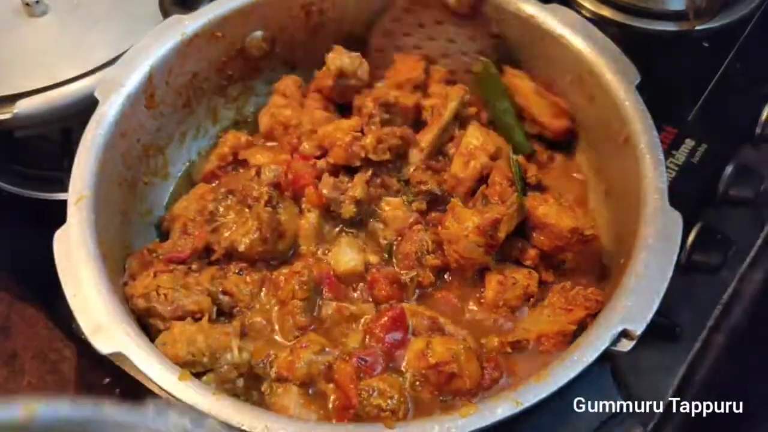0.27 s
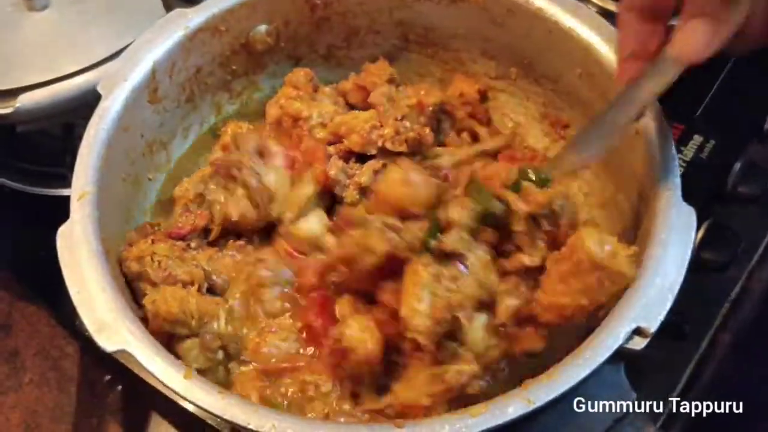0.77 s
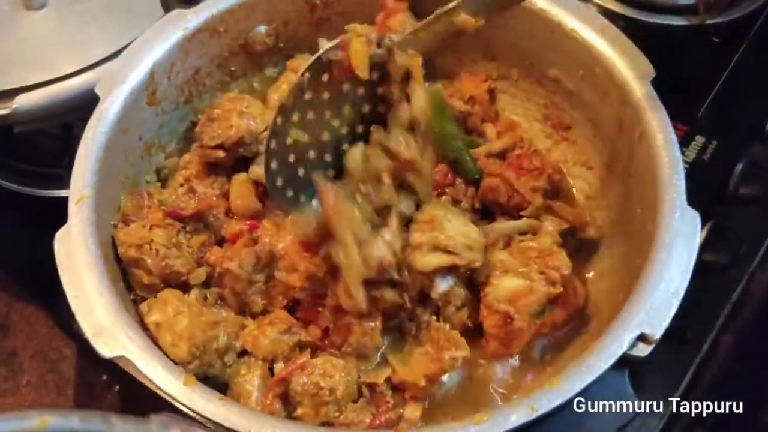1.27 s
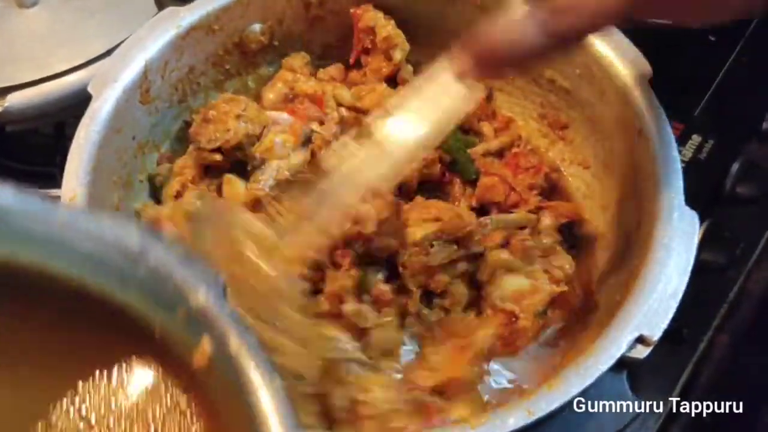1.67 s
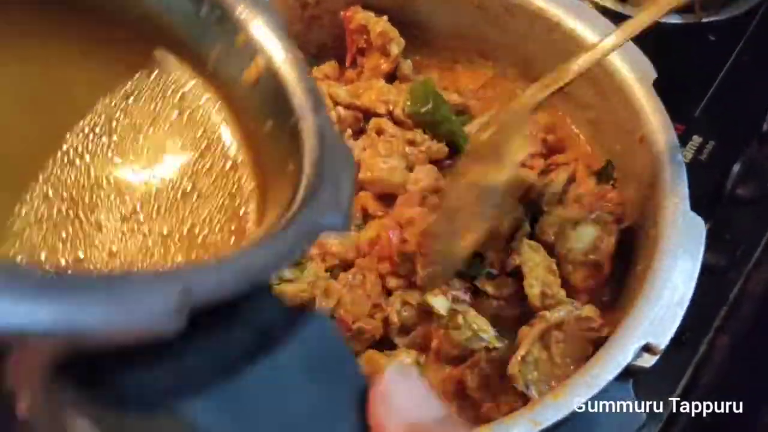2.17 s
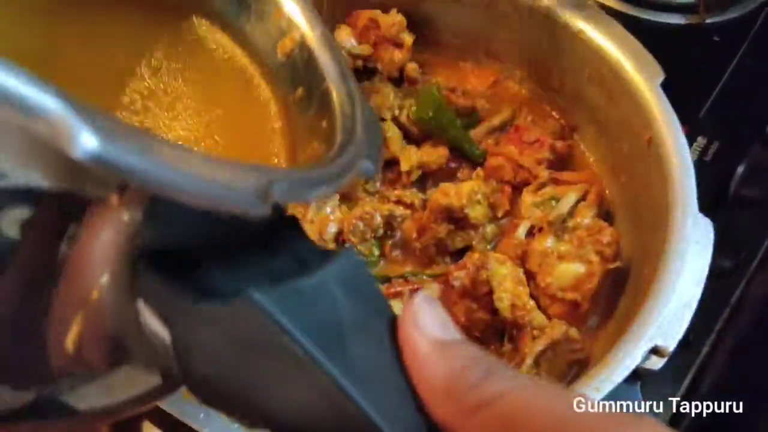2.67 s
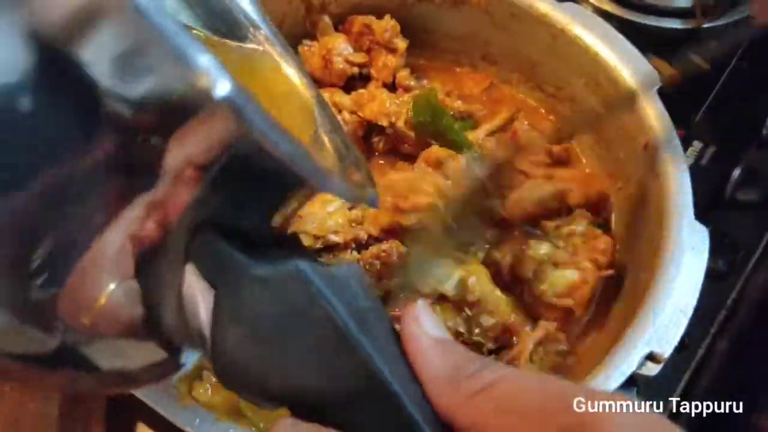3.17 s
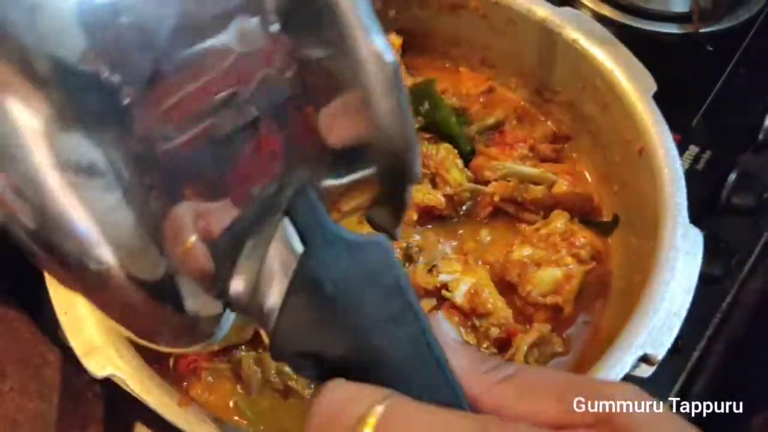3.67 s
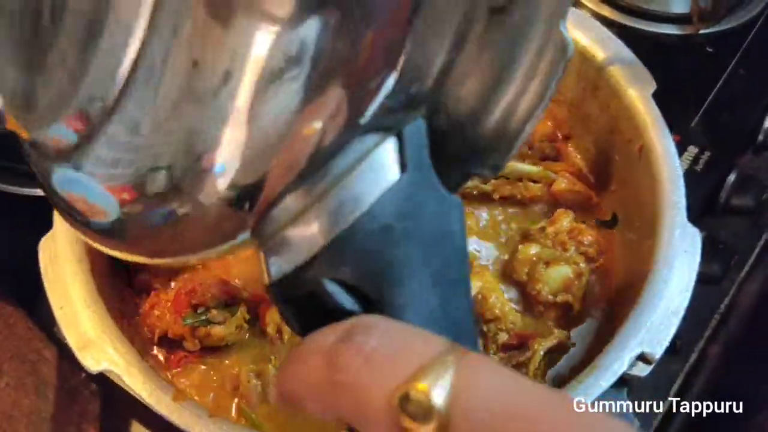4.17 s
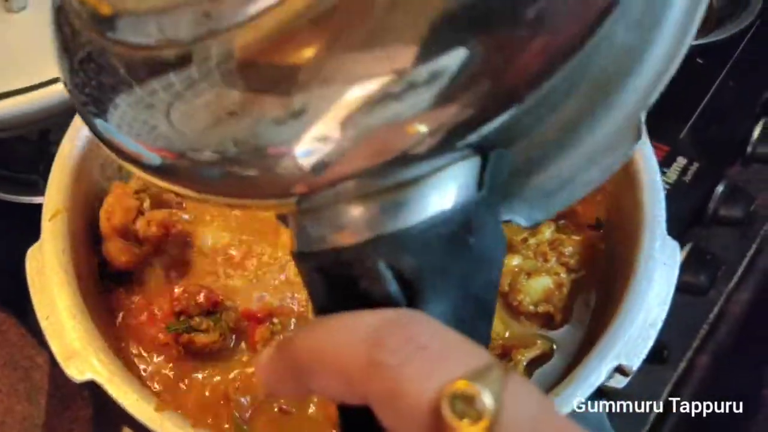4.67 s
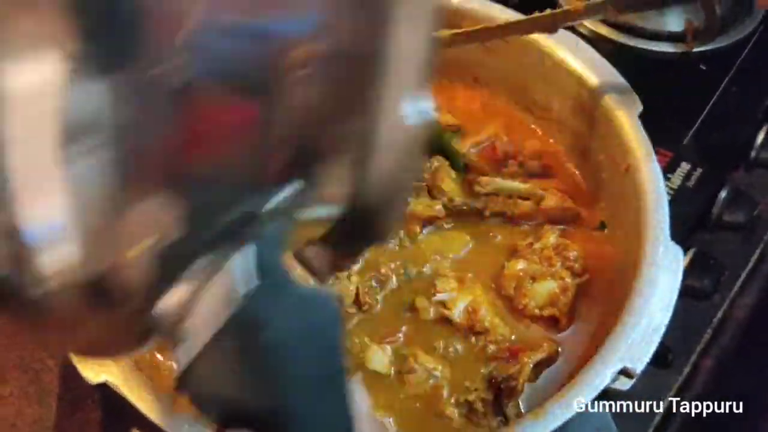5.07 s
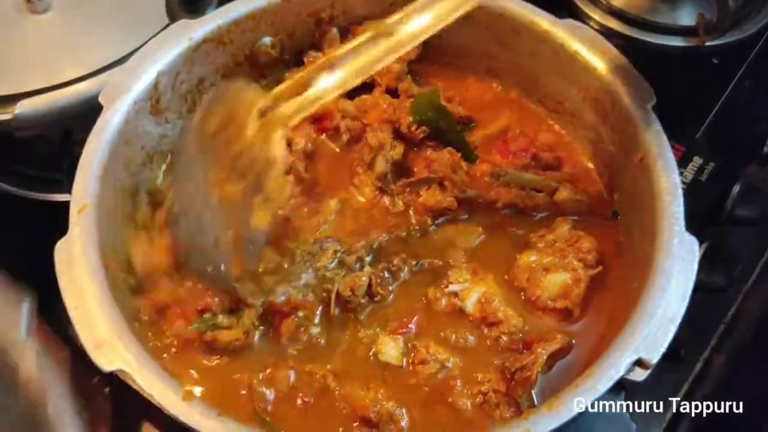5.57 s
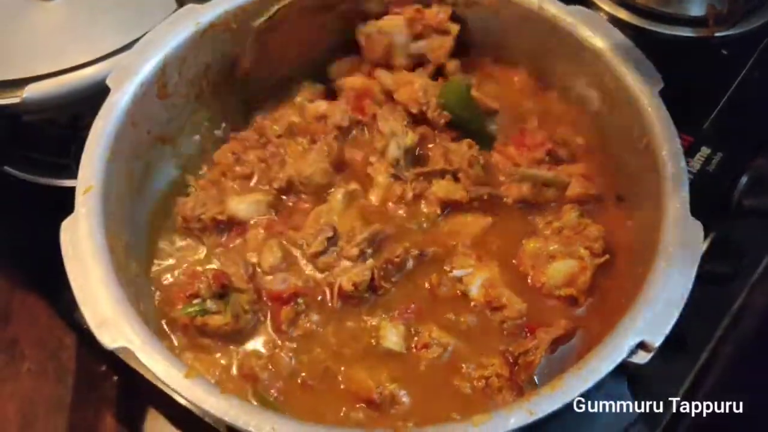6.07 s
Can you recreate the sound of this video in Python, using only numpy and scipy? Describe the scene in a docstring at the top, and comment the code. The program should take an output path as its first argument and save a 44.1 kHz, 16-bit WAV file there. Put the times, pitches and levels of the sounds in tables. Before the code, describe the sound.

A soft, low stove roar runs throughout in a small, hard-walled kitchen, heard close through a phone with thinned treble. From 0 to 1 s a ladle pushes wet food around a hot metal pot: loud sizzle and thick slosh, a low rubbing moan at the start, a couple of bubble pops near 0.4 and a dull knock at 0.7. The hiss eases, flaring at 1.6 with a light clank. Clanks follow at 2.4, 2.85 and 3.35, among thin sharp fat spits and shrinking sizzle. From about 3.8 to 4.7 broth pours in, with dense bubbly plops, fine spatter and renewed hiss, strongest near 4.3, ending in two bright snaps at 4.7. It falls nearly quiet around 5 to 5.6. At 5.7 a bright ladle clank starts wet, sizzling strokes with low drags, and a faint rasp closes at 6.2.

```python
"""Wet food sizzles and sloshes in a hot metal pot, over the steady roar of a stove in a small kitchen.
A steel ladle drags and strikes, bubbles pop, fat spits and broth pours in, close to a phone's microphone.
Hiss and slosh are shaped noise with tiny bubbles; pot and ladle are sets of decaying modes; pops and drops
are short rising tones. The hard walls answer the sharp sounds, and the phone thins weak treble."""
import sys
import numpy as np
from scipy import signal
from scipy.fft import rfft, irfft, next_fast_len
from scipy.io import wavfile
from scipy.ndimage import uniform_filter1d, map_coordinates

SR = 44100
rng = np.random.default_rng(int(sys.argv[2]) if len(sys.argv) > 2 else 0)


def master_out(mix):
    """Clip the mix to full scale and print it as 16-bit PCM to the path in sys.argv[1]."""
    frames = np.transpose(np.atleast_2d(mix))
    ceiling = np.clip(frames, -1, 1)
    pcm = np.round(ceiling * 32767).astype(np.int16)
    wavfile.write(sys.argv[1], SR, pcm)


N = 278712  # length in samples

# Ringing modes of the metal pot. Each row: pitch in Hz, relative level in dB, 60 dB decay time in seconds.
POT = [(216.6, -2.5, 0.22), (459, -3.5, 0.2), (959, 1.5, 0.25), (1179, 0, 0.061), (1616, 3, 0.09),
       (1753, -3.5, 0.023), (2337, -3, 0.1)]
# Ringing modes of the steel ladle. Each row: pitch in Hz, relative level in dB, 60 dB decay time in seconds.
LADLE = [(1235, -13, .07), (1890, 1.5, 0.026), (2860, -9, 0.12), (3600, -8, 0.072), (4180, -4, 0.043),
         (4720, -4.5, 0.033), (5184, -5.5, 0.038), (5730, -1.5, 0.041), (6310, 2.5, 0.05),
         (6630, -9, 0.041), (7150, -5.5, 0.057), (7800, -10, 0.054)]


def amp(db):
    """Decibels to an amplitude factor."""
    return 10 ** (np.asarray(db) / 20)


def unit(x):
    """x scaled to an RMS of one."""
    return x / np.sqrt(np.mean(x ** 2) + 1e-20)


def along(points, hz):
    """A curve through (Hz, value) points, straight on a log frequency axis."""
    f, v = np.transpose(points)
    return np.interp(np.log(hz + 1), np.log(f + 1), v)


def wobble(rate):
    """A smooth random curve with rate knots a second."""
    knots = rng.standard_normal(int(N * rate / SR) + 4)
    return map_coordinates(knots, [np.arange(N) * rate / SR])


def filtered(x, response):
    """x with its spectrum multiplied by a real or complex response of frequency."""
    m = next_fast_len(N + SR // 2)
    return irfft(rfft(x, m) * response(np.fft.rfftfreq(m, 1 / SR)), m)[:N]


def patchy(x, patchy_db):
    """x with random gain patches in time and frequency, of RMS depth patchy_db."""
    z = signal.stft(x, nperseg=512)[2]
    field = uniform_filter1d(rng.standard_normal(z.shape), size=5, axis=0)
    field = uniform_filter1d(field, size=10, axis=1)
    return signal.istft(z * amp(patchy_db * unit(field)), nperseg=512)[1][:N]


def bubbles(per_s, centre_hz, octaves, cycles, spread_db):
    """Tiny bursts at random times: damped, rising sines of random pitch and size, at unit RMS."""
    count = int(per_s * N / SR)
    at = rng.random(count)
    pitch, size = rng.standard_normal((2, count, 1))
    k = np.arange(512)
    turn = np.clip(centre_hz * 2 ** (octaves * pitch), 300, 9000) * k / SR  # in cycles
    chirp = np.sin(2 * np.pi * turn * (1 + 0.04 * turn / cycles))
    grain = amp(spread_db * size) * chirp * np.exp(-turn / cycles)
    place = (at[:, None] * N).astype(int) + k
    return unit(np.bincount(place.ravel(), grain.ravel(), N + 512)[:N])


def add(out, s, sound):
    """Adds a short sound at s seconds."""
    out[round(s * SR):][:len(sound)] += sound


def resonances(modes):
    """A table of modes as a response of frequency; wet food sets how sharply they sound."""
    width_scale = 0.88  # times the bandwidth that each decay time implies
    widths = [width_scale * np.log(1000) / (np.pi * t60) for _, _, t60 in modes]

    def response(f):
        return sum(amp(db) * 1j * f * w / (c * c - f * f + 1j * f * w)
                   for (c, db, _), w in zip(modes, widths))
    return response


def kitchen():
    """Steady flame roar and room noise: slightly patchy noise through a fixed spectrum."""
    # Stove flame and room. Each row: frequency in Hz, relative density in dB per Hz.
    flame_spectrum = [(25, -6.5), (50, -29), (90, -12), (154, -14.5), (200, -6), (395, -4), (468, -2.5),
                      (582, -7), (797, -15), (1330, -13), (1950, -16.5), (2550, -40.5), (2850, -18),
                      (3300, -55)]
    roar = filtered(patchy(rng.standard_normal(N), patchy_db=0.8), lambda hz: amp(along(flame_spectrum, hz)))
    return amp(-50.5) * unit(roar)


def room(x):
    """Hard kitchen walls: every stretch of sound gets its own decaying noise tail."""
    t60_s, delay_s = 0.12, 0.003
    t, out, step = np.arange(SR // 3) / SR, np.zeros(N + SR), SR // 8
    for start in range(0, N, step):
        tail = rng.standard_normal(len(t)) * amp(-60 * t / t60_s)
        tail /= np.linalg.norm(tail)
        add(out, start / SR + delay_s, signal.fftconvolve(x[start:start + step], tail))
    return out[:N]


def rasp():
    """The ladle's edge rasps on the wall: friction noise in a flat-topped band, from its start to the end."""
    # One row: start in seconds, level in dB, band centre in Hz, band width in Hz.
    s, db, hz, width_hz = (6.183, -51, 2950, 1200)
    band = filtered(rng.standard_normal(N), lambda f: 1 / (1 + (2 * (f - hz) / width_hz) ** 6))
    return amp(db) * unit(band) * (np.arange(N) > s * SR)


def moans():
    """Low moans of the pot, mostly stick-slip rubbing of the ladle: a low mode and, weaker, one near two
    octaves up; pitch wavers."""
    # Low moans. Each row: start in seconds, length in seconds, level in dB, first Hz, last Hz. Most are drags
    # of the ladle; the one at 1.843 s is the pot's own low ring.
    moan_rows = [(0, 0.18, -46, 306.6, 284), (0.248, 0.086, -53.5, 211.6, 202.5),
                 (1.843, 0.23, -54, 206.8, 198.6), (5.757, 0.063, -53, 225.7, 205.6),
                 (5.875, 0.28, -49, 317, 276.4), (6.218, 0.076, -50.5, 211.7, 204)]
    out = np.zeros(N + SR)
    for s, length, db, first_hz, last_hz in moan_rows:
        n = int(length * SR)
        turn = 2 * np.pi * np.cumsum(np.linspace(first_hz, last_hz, n)) / SR
        drift = 0.052 * np.cumsum(rng.standard_normal((2, SR // 2)), axis=1)[:, :n]
        moan = np.sin(turn + drift[0]) + 0.23 * np.sin(3.9 * turn + 2.74 * drift[1])
        add(out, s, amp(db) * np.sqrt(2) * moan * signal.windows.tukey(n, 0.4))
    return out[:N]


def snaps():
    """Last drops on hot metal: one sudden push and a few milliseconds of bright rattle."""
    # Each row: start in seconds, level in dB.
    snap_rows = [(4.6732, -33), (4.696, -28.5)]
    t60_s = 0.012
    out, t = np.zeros(N + SR), np.arange(SR // 20) / SR
    for s, db in snap_rows:
        push = np.sin(2 * np.pi * 3000 * t) * np.exp(-t * 3000)
        rattle = amp(-60 * t / t60_s) * np.diff(rng.standard_normal(len(t) + 1))
        add(out, s, amp(db) * (2 * push + 1.4 * rattle))
    return out[:N]


def spits():
    """Fat spitting: a thin sharp tick, its tones spread evenly over a band round its pitch."""
    # Each row: start in seconds, level in dB, pitch in Hz.
    spit_rows = [(0.8527, -32.5, 4020), (1.2242, -31, 6400), (1.331, -38, 4270), (1.453, -38, 4820),
                 (1.734, -30.5, 6420), (1.894, -36, 4300), (2.23, -38, 7340), (2.2555, -32, 6500),
                 (2.286, -34, 6760), (2.429, -33.5, 6900), (2.4605, -30, 4860), (2.5226, -37, 6600),
                 (2.55, -39, 4900), (2.572, -41.5, 4580), (2.7315, -34, 6250), (2.794, -34.5, 4940),
                 (3.0112, -37, 2180), (3.145, -34.5, 6280), (3.182, -35.5, 6270), (3.253, -33, 6970),
                 (3.2984, -33.5, 6580), (3.505, -43, 4830), (3.5444, -36.5, 5800), (3.678, -38, 6340),
                 (3.689, -34.5, 5300), (3.705, -42, 5400), (3.72, -42, 4600), (3.735, -33, 6770),
                 (3.824, -34.5, 5770), (3.845, -30, 3250), (4.112, -34, 6240), (4.2876, -31, 6520),
                 (4.5186, -27.5, 7700), (4.58, -32, 6300), (4.639, -29, 7000), (4.968, -41.5, 7600),
                 (5.277, -48, 6670), (5.604, -35.5, 6180), (5.685, -40.5, 4200), (5.863, -34.5, 6840),
                 (6.05, -35.5, 5100), (6.1842, -39, 2980)]
    out, t = np.zeros(N + SR), np.arange(SR // 10) / SR
    for s, db, hz in spit_rows:
        spread = 0.2 * np.linspace(-1, 1, 13)[:, None] + 0.015 * rng.standard_normal((13, 1))
        near = hz * (1 + spread)
        tones = np.sin(2 * np.pi * (near * t + 0.55 * rng.random((13, 1))))
        puff = tones.sum(axis=0) / np.sqrt(len(near))
        add(out, s, amp(db - 60 * t / 0.013) * (1 - np.exp(-t / 0.00027)) * puff)
    return out[:N]


def pops():
    """Bubbles bursting in the gravy: damped tones whose pitch rises as each bubble opens."""
    # Each row: start in seconds, relative level in dB, starting pitch in Hz.
    pop_rows = [(0.367, -23, 1710), (0.4157, -21.5, 1940), (1.211, -23, 1560), (1.433, -30.5, 2170),
                (1.745, -32, 1750), (3.8233, -32, 2180), (3.8427, -22.5, 1670), (3.915, -21, 1940),
                (3.9448, -25, 1800), (3.9977, -30.5, 1640), (4.1355, -31, 1970), (4.1617, -25, 1740),
                (4.183, -31, 1680), (4.1997, -19.5, 1450), (4.222, -21.5, 1660), (4.226, -25, 1900),
                (4.251, -25, 1990), (4.274, -31, 2360), (4.276, -24.5, 6000), (4.301, -23.5, 1960),
                (4.308, -25, 2560), (4.314, -25, 2710), (4.33, -31, 5600), (4.3297, -24.5, 1840),
                (4.367, -33, 1800), (4.379, -31, 3840), (4.4244, -19, 3990), (4.455, -35, 4020),
                (4.528, -32.5, 3160), (4.553, -32.5, 1680), (4.568, -26, 2100), (4.582, -29, 3000),
                (4.597, -29, 5970), (4.6117, -29, 2120), (4.69, -26, 1750), (4.697, -22, 3400),
                (4.736, -32.5, 3930), (6.004, -32, 1840)]
    out, t = np.zeros(N + SR), np.arange(SR // 10) / SR
    for s, db, hz in pop_rows:
        tone = np.sin(2 * np.pi * hz * t * (1 + 22 * t))
        add(out, s, amp(db + 0.5 - 60 * t / 0.0091) * (1 - np.exp(-t / 0.00063)) * tone)
    return out[:N]


def pouring():
    """Broth runs in from a second pan: dense short chirps of mixed sizes under a finer, brighter spatter."""
    # Each row: time in seconds, level in dB.
    pour_level = [(3.7, -77), (3.85, -52), (4.1, -52), (4.3, -49), (4.45, -55.5), (4.6, -53), (4.75, -75)]
    s, db = np.transpose(pour_level)
    droplets = bubbles(per_s=340, centre_hz=2400, octaves=0.5, cycles=5, spread_db=4.5)
    spatter = bubbles(per_s=200, centre_hz=6000, octaves=0.25, cycles=5.6, spread_db=4.5)
    return amp(np.interp(np.arange(N) / SR, s, db)) * (droplets + amp(-5) * spatter)


def blows():
    """Each blow cracks, then rings pot and ladle anew; food damps the high modes into a rough clank."""
    # Ladle blows. Each row: start in seconds, relative level in dB on the pot wall, relative level in dB on
    # the ladle's rim, dullness of the pot in dB per octave over 1 kHz.
    blow_rows = [(0.695, -26.5, -55, 14), (1.629, -47.5, -40, 1.5), (1.887, -43, -46, -3),
                 (2.3736, -27.5, -46, 1.5), (2.8305, -51, -23, 4), (2.855, -52, -44, -3),
                 (3.116, -48, -35, 4), (3.341, -27, -41.5, 2.5), (3.379, -37, -34, 8),
                 (5.7129, -39.5, -20, 7), (5.725, -28.5, -43, 4), (5.729, -35, -43, 6)]
    body_hz = 714  # below this the modes ring ever cleaner, with less clank and drift
    clank_db, clank_t60_s = 10, 0.016  # the clank over the ringing, and its decay
    out, t = np.zeros(N + SR), np.arange(SR // 2) / SR
    clank = amp(clank_db - 60 * t / clank_t60_s)
    onset = (1 - np.exp(-t / 0.0006)) / 5
    for s, wall_db, rim_db, dull_db in blow_rows:
        for modes, db, slope_db in ((POT, wall_db, dull_db), (LADLE, rim_db, 0)):
            rattle = np.cumsum(rng.standard_normal((len(modes), len(t))), axis=1) * 0.088
            for (hz, level, t60), drift in zip(modes, rattle):
                rough = min(1, hz / body_hz)
                level = level - slope_db * max(0, np.log2(hz / 1000))
                ring = np.sin(2 * np.pi * hz * rng.normal(1, 0.0045) * t + rough * drift)
                decay = amp(db + level + rng.normal(0, 1.9) - 60 * t / t60)
                add(out, s, decay * onset * (1 + rough * clank) * ring)
        crack = np.diff(rng.standard_normal(len(t) + 1))
        add(out, s, amp(rim_db + 2.5 - 60 * t / 0.0075) * crack)
    return out[:N]


def flared(simmer_db, column, fade_db_per_s):
    """Gain of a layer: its simmer plus, in power, the climb and fade of wet food laid on hot metal."""
    # Flares. Each row: peak time in seconds, rise time in seconds, sizzle level in dB, slosh level in dB.
    flare_rows = [(0.155, 0.17, -44.5, -45.5), (0.399, 0.1, -51.5, -44.5), (0.52, 0.35, -44.5, -43.5),
                  (1.634, 0.017, -46, -54.5), (1.95, 0.12, -53, -59), (2.47, 0.13, -54.5, -56),
                  (2.736, 0.008, -56.5, -62), (2.86, 0.025, -48, -57), (2.988, 0.25, -54.5, -59.5),
                  (3.15, 0.023, -57, -57), (3.27, 0.071, -62.5, -58), (3.38, 0.26, -51.5, -59),
                  (3.6, 0.11, -56, -67), (3.7, .015, -55.5, -63), (4.03, 0.069, -55, -58.5),
                  (4.3, 0.041, -45, -51), (4.43, 0.15, -47, -56), (4.57, 0.06, -52, -64),
                  (4.975, .012, -63.5, -70), (5.62, .025, -56.5, -67), (5.73, 0.012, -46, -52.5),
                  (5.9, 0.052, -49, -48), (6.03, 0.039, -53.5, -55.5), (6.2, .02, -54.5, -50)]
    climb_db = 15.5  # gained over one rise time
    t, power = np.arange(N) / SR, amp(2 * simmer_db)
    for row in flare_rows:
        late = t - row[0]
        shape_db = np.where(late < 0, climb_db * late / row[1], -fade_db_per_s * late)
        power = power + amp(2 * (row[column] + shape_db))
    return np.sqrt(power)


def stirring():
    """Steam hiss with crackle over sloshing gravy, both setting the metal's modes ringing."""
    # Food simmering between strokes. Each row: time in seconds, sizzle level in dB, slosh level in dB,
    # sizzle tilt in dB (upper hiss against lower).
    simmer_rows = [(0.0, -45, -43, -10.5), (0.3, -49.5, -46, -3.5), (0.65, -47, -45.5, -1),
                   (0.95, -49.5, -49.5, -4.5), (1.45, -54, -53.5, -1), (1.85, -54, -52, -4),
                   (2.15, -60.5, -56, -0.5), (2.45, -54.5, -55.5, -3.5), (2.6, -58.5, -64, -4),
                   (2.72, -66, -61.5, 2.5), (3.1, -73, -60, -6), (3.55, -65.5, -66, 0.5),
                   (3.85, -51.5, -59.5, -2.5), (4.5, -57.5, -59.5, -6), (4.78, -56, -60.5, -11),
                   (4.95, -69.5, -62, 5), (5.3, -69, -65.5, 7.5), (5.58, -72.5, -62, 1.5),
                   (5.9, -54, -58.5, -1), (6.32, -58, -56.5, -6)]
    # Hiss colour. Each row: frequency in Hz, relative density in dB per Hz.
    hiss_spectrum = [(1400, -19.5), (2400, -4), (2850, -5), (3350, -7), (4150, -6), (4950, -9.5),
                     (6200, -4), (7000, -3), (8300, -4), (9000, -30)]
    # Gravy colour. Each row: frequency in Hz, relative density in dB per Hz.
    slosh_spectrum = [(350, -21.5), (600, -1), (720, -9), (1220, 0.5), (1470, -4), (1800, -1.5), (2130, -1),
                      (2620, -12), (3000, -25.5), (3900, -45.5), (6600, -120)]
    s, *cols = np.transpose(simmer_rows)
    sizzle_db, slosh_db, tilt_db = (np.interp(np.arange(N) / SR, s, c) for c in cols)

    crackle = bubbles(per_s=700, centre_hz=5000, octaves=0.4, cycles=2.5, spread_db=3.2)
    steam = patchy(rng.standard_normal(N) + 0.45 * crackle, patchy_db=1.1)
    # spatter keeps the ladle sounding within the hiss
    steam = unit(steam) + amp(-18) * unit(filtered(steam, resonances(LADLE)))
    whole = unit(filtered(steam, lambda hz: amp(along(hiss_spectrum, hz))))
    # drier spots hiss higher: the weight moves between the lower and upper hiss
    low = filtered(whole, lambda hz: 1 / (1 + (hz / 5200) ** 8))
    tilted = amp(-tilt_db / 2) * low + amp(tilt_db / 2) * (whole - low)
    hiss = flared(sizzle_db, column=2, fade_db_per_s=94) * amp(1.0 * wobble(25)) * tilted

    blips = bubbles(per_s=250, centre_hz=1695, octaves=0.35, cycles=5.5, spread_db=1.2)
    wet = patchy(rng.standard_normal(N) + 0.17 * blips, patchy_db=1.1)
    slosh_gain = flared(slosh_db, column=3, fade_db_per_s=85.5) * amp(0.25 * wobble(9.2))
    gravy = unit(filtered(wet, lambda hz: amp(along(slosh_spectrum, hz))))
    pot_ring = amp(-13) * unit(filtered(wet, resonances(POT)))
    return hiss + slosh_gain * (gravy + pot_ring)


def scene():
    """All sources at one microphone that feeds both channels; only the sharp sounds excite the room."""
    sharp = blows() + snaps() + pops() + spits() + pouring()
    mix = kitchen() + stirring() + moans() + rasp() + sharp + amp(-5.0) * room(sharp)
    return np.tile(mix, (2, 1))


def record(dry):
    """The phone: a suppressor fades weak patches, then come the band limit and faint converter noise."""
    # Noise suppressor, closing below this power. Each row: frequency in Hz, power in dB per bin.
    gate_floor = [(1900, -110), (2600, -75.5), (4500, -76), (6300, -83), (8000, -77)]
    # Band limit of the phone. Each row: frequency in Hz, gain in dB.
    band_limit = [(20, -25), (90, 0), (7600, 0), (8000, -20), (8300, -24), (8500, -42), (9500, -46),
                  (15000, -48)]
    top_hz = 15800  # nothing passes above this
    hz, _, z = signal.stft(dry[0], SR, nperseg=512)
    power = uniform_filter1d(np.abs(z) ** 2, size=2, axis=0)
    power = uniform_filter1d(power, size=8, axis=1)
    threshold = amp(2 * along(gate_floor, hz))[:, None]
    gain = np.maximum(power / (power + threshold), amp(-16))
    kept = signal.istft(z * gain, SR, nperseg=512)[1][:N]
    converter_hiss = amp(-98) * rng.standard_normal(N)
    heard = filtered(kept, lambda f: amp(along(band_limit, f))) + converter_hiss
    return np.tile(filtered(heard, lambda f: f < top_hz), (2, 1))


dry = scene()
out = record(dry)
master_out(out)
```